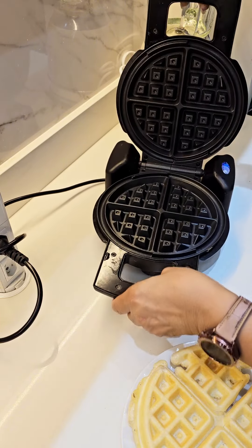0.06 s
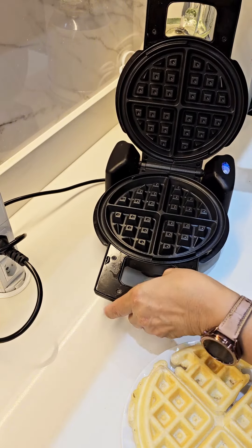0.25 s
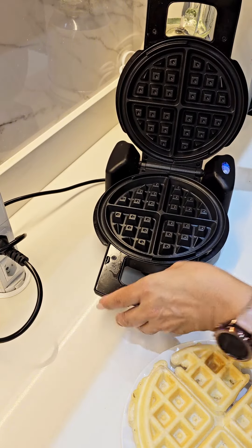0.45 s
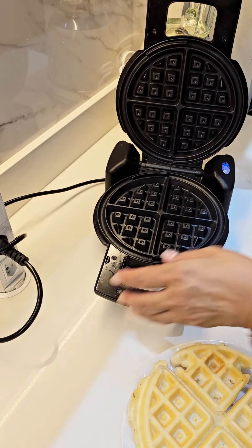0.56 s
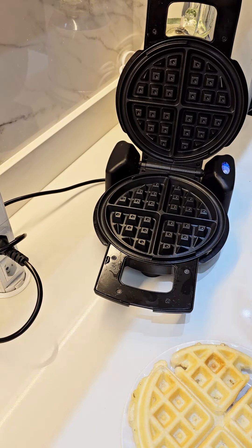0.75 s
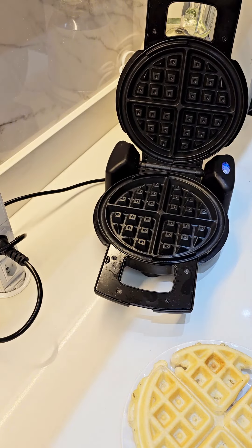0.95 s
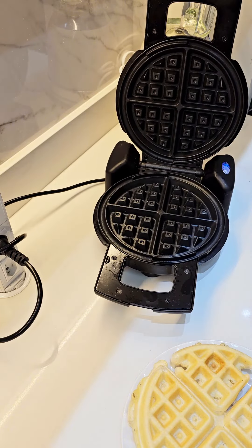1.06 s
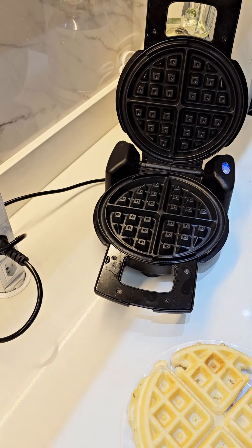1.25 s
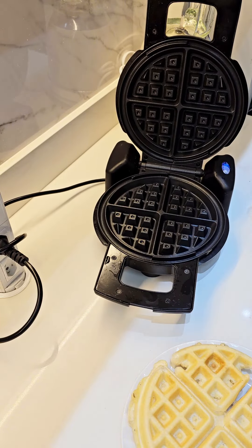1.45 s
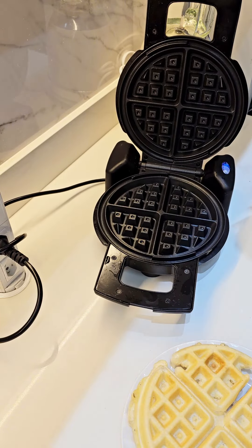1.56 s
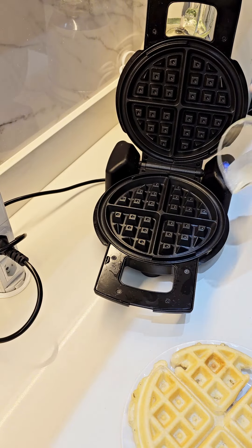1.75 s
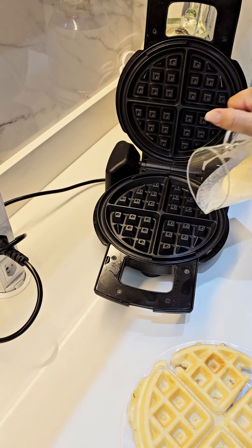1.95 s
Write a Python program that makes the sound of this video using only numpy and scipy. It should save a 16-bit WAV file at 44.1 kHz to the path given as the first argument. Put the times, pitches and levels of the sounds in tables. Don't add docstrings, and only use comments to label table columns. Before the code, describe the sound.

A waffle maker lid hits its stop with a loud plastic crack and low clunk, then a catch snaps and loose parts tick; later a sleeve brushes and a hand softly knocks the worktop, close in a tiled kitchen.

```python
import sys
import numpy as np
from scipy import signal
from scipy.io import wavfile
from scipy.ndimage import uniform_filter1d

SR = 44100
rng = np.random.default_rng(int(sys.argv[2]) if len(sys.argv) > 2 else 0)


def natural_amplitude(level_db):
    exponent = np.asarray(level_db, float) / 20
    return 10 ** exponent


def generate_wav(sig):
    pcm = np.round(np.clip(np.atleast_2d(sig).T, -1, 1) * 32767).astype(np.int16)
    wavfile.write(sys.argv[1], SR, pcm)


N = 88200

LEAD_S = .05
LONG_N = N + int(LEAD_S * SR)
OFF_PITCH_DB = 6.5


def rms_one(x):
    return x / np.sqrt(np.mean(x ** 2) + 1e-20)


def at_hz(points, hz):
    table = np.array(points)
    return np.interp(np.log(hz), np.log(table[:, 0]), table[:, 1])


def drift(rate):
    r = np.exp(-80 * np.pi * rate / SR)
    slow = signal.lfilter([1], [1, -2 * r, r * r], rng.standard_normal(N // 40 + 2002))[2000:]
    return np.interp(np.arange(N) / 40, np.arange(len(slow)), rms_one(slow - slow.mean()))


def pan(db):
    return natural_amplitude(np.array([[db / 2], [-db / 2]]))


def heard(x, lr_db, late_ms):
    n = np.arange(len(x))
    return pan(lr_db) * [np.interp(n - late_ms * SR / 1000, n, x), x]


def clicks_at(s, size):
    out = np.zeros(LONG_N)
    np.add.at(out, ((np.asarray(s) + LEAD_S) * SR).astype(int), size)
    return out


def ring(clicks, hz, t60):
    r = natural_amplitude(-60 / (max(t60, .001) * SR))
    w = 2 * np.pi * hz / SR
    return signal.lfilter([0, np.sin(w)], [1, -2 * r * np.cos(w), r * r], clicks + 1e-18)


def filtered(x, order, hz, kind="low"):
    return signal.sosfilt(signal.butter(order, hz, kind, fs=SR, output="sos"), x)


def resonant_noise(hz, width_hz):
    r = np.exp(-np.pi * width_hz / SR)
    stage = [1, 0, -1, 1, -2 * r * np.cos(2 * np.pi * hz / SR), r * r]
    return rms_one(signal.sosfilt([stage, stage], rng.standard_normal(N + SR))[SR:])


def bands(low_hz, gain):
    # f/Hz, correlation [-1..1]
    likeness = [(60, 0.57), (240, 0.71), (950, 0.026), (3770, 0.018), (15000, 0.0092)]
    edges = 18000 / 2 ** np.arange(0, np.log2(18000 / low_hz), .5)[::-1]
    white = rng.standard_normal((2, 2, N))
    out = 0
    for k, (low, high) in enumerate(zip(edges, edges[1:])):
        mid, side = filtered(white[k % 2], 2, [low, high], "band")
        hz = np.sqrt(low * high)
        alike = np.clip(at_hz(likeness, hz), -1, 1)
        stereo = np.sqrt(1 + alike) * mid + np.sqrt(1 - alike) * side * [[1], [-1]]
        out = out + gain(hz) * stereo
    return out


def house():
    # t/s, level/dB
    rumble_swell = [(0.0, -31.5), (0.03, -30), (0.07, -37), (0.22, -30.5), (0.24, -44), (0.52, -34),
                    (0.59, -44), (0.63, -30.5), (0.811, -38.5), (0.841, -28.5), (0.89, -34), (1.36, -27.5),
                    (1.49, -40), (1.54, -31.5), (1.611, -36.5), (1.65, -56), (1.68, -40.5), (2.0, -41.5)]
    # f/Hz, density/dB per Hz
    air_colour = [(80, 1), (220, -16.5), (600, -15.5), (900, -22), (2500, -26), (8500, -37), (11000, -36),
                  (16000, -32)]
    # t/s, level/dB
    air_swell = [(0, 6.5), (.6, 4), (.9, 3.5), (1.2, 4.5), (1.55, 2), (1.701, 2), (2, 0)]
    # f/Hz, width/Hz, level/dB
    whine_tones = [(7000, 300, -82), (11000, 450, -75), (13200, 600, -77)]
    hum_db, hum_follows, air_db, air_wander_db = -47, .25, -50.5, 1.0
    t = np.arange(N) / SR

    db = np.interp(t, *np.transpose(rumble_swell))
    low = resonant_noise(46.53, 17.4)
    low = low / (uniform_filter1d(low ** 2, size=950) + .02) ** .45
    hum = natural_amplitude(hum_db + hum_follows * (db - db.mean())) * resonant_noise(108.3, 25)
    hum = hum / (uniform_filter1d(rms_one(hum) ** 2, size=1500) + .1) ** .25

    swell = np.interp(t, *np.transpose(air_swell))
    air = rms_one(bands(75, lambda hz: natural_amplitude(
        at_hz(air_colour, hz) + air_wander_db * drift(1.9) + swell * (hz < 2000))))
    whines = sum(natural_amplitude(level_db) * np.array([resonant_noise(hz, width) for _ in range(2)])
                 for hz, width, level_db in whine_tones)
    sub = natural_amplitude(db - 19.0) * resonant_noise(28.4, 23.0)
    return natural_amplitude(db) * low * pan(0.98) + sub + hum + natural_amplitude(air_db) * air + whines


def kitchen(x):
    # f/Hz, t60/s
    room_t60 = [(100, 0.8), (400, 0.96), (1500, 0.65), (5000, 0.54), (14000, 0.2)]
    # f/Hz, level/dB
    room_colour = [(150, -15), (400, -1.5), (1500, 0), (5000, -2), (14000, 3)]
    room_db, first_echo_s, early_db, early_t60_s = -11.5, .003, 8, 0.072
    t = np.arange(N) / SR - first_echo_s
    early = 1 + natural_amplitude(early_db - 60 * t / early_t60_s)
    tail = bands(72.1, lambda hz: (t > 0) * early * natural_amplitude(
        at_hz(room_colour, hz) - 60 * t / at_hz(room_t60, hz)))
    return natural_amplitude(room_db) * signal.fftconvolve(x, tail / np.sqrt(SR / 20), axes=1)[:, :x.shape[1]]


def sleeve():
    # t/s, level/dB, rise/s, t60/s
    strokes = [
        (.955, -50, 0.027, 0.38),
        (.987, -42.5, 0.013, 0.43),
        (1.04, -61, 0.014, 0.21),
        (1.075, -57, 0.019, 0.12),
    ]
    # f/Hz, density/dB per Hz
    cloth = [(500, 4.5), (1000, 1.5), (3000, 0), (6000, -5), (9000, -8.5), (12000, -10.5), (16000, -10)]
    grain_db = 1.2
    t = np.arange(N) / SR
    level = 0
    for s, db, rise, t60 in strokes:
        fall = natural_amplitude(db - 60 * np.maximum(t - s - rise, 0) / t60)
        level = level + fall * np.clip((t - s) / rise, 0, 1) ** 2
    return level * natural_amplitude(grain_db * drift(110)) * rms_one(bands(400, lambda hz: natural_amplitude(at_hz(cloth, hz))))


def squeaks():
    # t/s, length/s, level/dB, f/Hz, width/Hz
    narrow_noises = [(-.01, 0.033, -44.5, 654, 597), (0.082, 0.026, -50, 600, 197),
                     (0.087, 0.017, -63.5, 13000, 6000), (0.246, 0.1, -43, 687, 59), (0.281, 0.06, -38, 209.5, 30.2),
                     (0.419, 0.088, -44, 292, 25.2), (0.518, 0.063, -60.5, 3164, 150),
                     (0.64, 0.023, -73.5, 7600, 600), (0.918, 0.07, -58, 3180, 513), (0.943, 0.062, -60, 2270, 605),
                     (1.125, 0.5, -64, 571, 147), (1.22, 0.026, -57.5, 1070, 1460), (1.723, 0.077, -69, 4050, 150),
                     (1.702, 0.017, -66, 2920, 300), (1.794, 0.071, -53, 2110, 220),
                     (1.845, 0.043, -64.5, 9100, 2520), (1.887, 0.06, -69.5, 3710, 244)]
    attack_s, flicker_db = 0.0051, -1.5
    t = np.arange(N) / SR
    out = 0
    for s, length, db, hz, width in narrow_noises:
        rub = natural_amplitude(db + flicker_db * drift(39)) * resonant_noise(hz, width)
        rise = np.clip((t - s) / attack_s, 0, 1)
        release = np.exp(-np.maximum(t - s - length, 0) / (length * 0.51))
        out = out + rub * rise * release
    return out


def knocks():
    # t/s, level/dB, f/Hz, t60/s
    taps = [(-.004, -28, 387, 0.076), (-.003, -31.5, 643, 0.071), (-.004, -32, 199.4, .08),
            (.99, -36.5, 970, 0.021), (0.991, -34.5, 214, 0.048), (1.002, -41, 443, 0.066),
            (1.055, -41, 430, 0.041), (1.078, -40.5, 900, 0.044), (1.121, -47, 1580, .02),
            (1.124, -45, 940, 0.038), (1.134, -46, 333, 0.084), (1.155, -43, 630, 0.056),
            (1.173, -45, 650, .04), (1.195, -47, 596, 0.045), (1.223, -39, 513, 0.034),
            (1.226, -48, 1640, 0.022), (1.231, -45, 770, 0.04), (1.234, -38, 590, 0.038),
            (1.247, -42, 458, .03), (1.261, -41, 543, 0.039), (1.274, -50, 860, 0.033),
            (1.279, -40, 420, 0.047)]
    rise_s = .003
    soft = np.hanning(int(2 * rise_s * SR))
    t = np.arange(len(soft)) / SR
    out = 0
    for s, db, hz, t60 in taps:
        contact = soft * np.cos(2 * np.pi * hz * t) * 2 / soft.sum()
        push = np.convolve(clicks_at([s], natural_amplitude(db)), contact)[:LONG_N]
        out = out + ring(push, hz, t60)
    return out


def loose_parts():
    # t/s, peak level/dB, left-right/dB, fade of the touches/s, favoured f/Hz
    ticks = [(0.0746, -39.5, 6.5, 0.0056, 2000), (0.1767, -35, 5, 0.016, 2190),
             (0.394, -30, -3, 0.0053, 1900), (0.409, -32, -7, 0.0055, 2900), (0.416, -33, 11, 0.006, 2100),
             (0.426, -40, 3, 0.006, 2100), (0.4401, -31.5, 0, 0.0022, 2770),
             (0.4438, -32, -1, 0.0056, 1670), (0.456, -34, 5, 0.0067, 1670),
             (0.4831, -37.5, -8, .004, 2440), (.489, -36.5, 2, .003, 1640), (0.515, -40, 3, 0.0025, 2170),
             (0.5197, -34.5, -1, 0.002, 1670), (0.9898, -38, 7, 0.0018, 1900),
             (1.732, -50.5, -3, .008, 1900), (1.93, -53.5, -5, 0.012, 2200)]
    # f/Hz, level/dB, t60/s
    latch = [(1670, -4, 0.018), (2017, -3.5, 0.01), (2420, -5.5, 0.0038), (2870, -6, 0.012),
             (3180, -5, 0.0088), (4100, -8, 0.0098), (5100, -13.5, 0.0083), (6200, -11, 0.0026),
             (7600, -17, .003), (10000, -28, 0.0019), (13000, -35, 0.0018)]
    touches_per_s, first_touch, bright_share, low_cut_hz = 2500, .6, 0.94, 620
    t = np.arange(LONG_N) / SR - LEAD_S
    hit = rng.random(len(t)) < touches_per_s / SR
    out = 0
    for hz, level_db, t60 in latch:
        sizes = 1.21 * rng.standard_normal((2, len(t))) + rng.standard_normal(len(t))
        clicks = 0
        for s, db, lr, length, pitch in ticks:
            run = hit * (t > s) * np.exp(-np.abs(t - s) / length) * sizes
            run = run + clicks_at([s], first_touch)
            off_pitch = OFF_PITCH_DB * abs(np.log2(hz / pitch))
            bright = bright_share * (db + 13.0) / 5 * np.log2(hz / 2000)
            clicks = clicks + run * pan(lr) * natural_amplitude(db - 4.5 + level_db - off_pitch + bright)
        out = out + ring(clicks, hz, t60)
    return filtered(out, 1, low_cut_hz, "high")


def catch():
    # t/s, level/dB, favoured f/Hz
    snap = [
        (0.3776, -23, 4500),
        (.3786, -17, 2100),
        (0.3795, -20.5, 2870),
        (0.3798, -24, 9000),
        (0.3819, -19, 2080),
        (0.383, -21.5, 1700),
        (.3848, -24.5, 3000),
        (.387, -33, 2920),
    ]
    # f/Hz, level/dB, t60/s, left-right/dB
    catch_modes = [(1440, -3, 0.0094, -6), (1680, -1, .011, -1), (2154, 1, 0.012, 6), (2344, -4, 0.0087, 6),
                   (3026, -1.5, 0.012, 2), (3266, -5, 0.0072, 0), (3620, -14.5, 0.014, 0),
                   (4230, -5, 0.007, 5), (5220, -10.5, 0.01, 7), (6220, -10, 0.0068, 4),
                   (7850, -13.5, 0.0064, 7), (10000, -14.5, 0.0035, 5), (12400, -14, .004, 11),
                   (14800, -23, .003, 10)]
    low_cut_hz = 1070
    s, db, pitch = np.transpose(snap)
    turn = (-1) ** np.arange(len(s))
    out = 0
    for k, (hz, level_db, t60, lr) in enumerate(catch_modes):
        off_pitch = OFF_PITCH_DB * np.abs(np.log2(hz / pitch))
        clicks = clicks_at(s, turn * natural_amplitude(db + level_db - off_pitch))
        out = out + pan(lr) * ring(clicks, hz, t60) * (-1) ** k
    return filtered(out, 2, low_cut_hz, "high")


def lid():
    # t/s, crack level/dB, body level/dB
    blows = [
        (-.012, -24, -18.5),
        (0.1966, -97, -18),
        (0.204, -4.5, 1),
        (.386, -63, -28),
    ]
    # t after first touch/s, level/dB
    chatter = [
        (0, 8.5),
        (.0009, -6),
        (.0016, -1.5),
        (.0023, 0.5),
    ]
    # f/Hz, level/dB, t60/s, left-right/dB, left ear late/ms
    shell = [(890, -23, 0.019, -21.5, 1), (1520, 0, 0.0023, -3.5, 0.19), (2362, -9.5, 0.019, 5.5, 0.063),
             (3510, -4.5, 0.0035, 4.5, 0.13), (4700, -6.5, 0.0025, 13, 0.084),
             (6400, -9.5, 0.0027, 4, 0.044), (7820, -14, 0.0025, 7, 0.049), (9400, -20.5, 0.0033, 2, 0.049),
             (10850, -19, 0.0037, 9, 0.059), (12500, -23, .005, 2, 0.026), (14500, -22, 0.006, 9, 0.023)]
    housing_hz = [221, 293, 346, 500, 644, 950, 1060, 1365, 1550, 1980, 2342]
    # level/dB, t60/s, left-right/dB, left ear late/ms
    housing = [(-8, 0.12, 2, 0.16), (-27, 0.19, 8, 0.95), (-8, 0.088, 4.5, 0.25), (-47, 0.016, 2, 1),
               (-11, 0.071, 2.5, 0.54), (-13, 0.031, -9.5, 0.21), (-14, 0.039, 8.5, 0.23),
               (-18, 0.018, 19, 0.081), (-26.5, 0.1, 12.5, 0.21), (-18.5, 0.041, -9, 0),
               (-27, 0.025, -3, 0.35)]
    # f/Hz, level/dB, t60/s
    worktop = [(120.9, -5.5, 0.23), (131.1, -19.5, 0.48)]
    touch_hz, contact_hz = 9000, 3030
    body_lag_s, upper_t60_s = 0.002367, .08
    worktop_rise_s, worktop_held = 0.053, 0.64

    touches = [(s + after, -natural_amplitude(db + less)) for s, db, _ in blows for after, less in chatter]
    touch = filtered(clicks_at(*np.transpose(touches)), 2, touch_hz)
    pushes = [(s + body_lag_s, natural_amplitude(db)) for s, _, db in blows]
    push = filtered(clicks_at(*np.transpose(pushes)), 1, contact_hz)

    out = 0
    for hz, db, t60, lr, ms in shell:
        out = out + natural_amplitude(db) * ring(heard(touch, lr, ms), hz, t60)
    for hz, (db, t60, lr, ms) in zip(housing_hz, housing):
        if hz >= housing_hz[3]:
            t60 = min(t60, upper_t60_s)
        out = out + natural_amplitude(db) * ring(heard(push, lr, ms), hz, t60)
    for hz, db, t60 in worktop:
        out = out - natural_amplitude(db) * (ring(push, hz, t60) - worktop_held * ring(push, hz, worktop_rise_s))
    return out


def scene():
    near = lid() + catch() + loose_parts() + knocks()
    near[:, -N:] += squeaks()
    return (near + kitchen(near))[:, -N:] + sleeve() + house()


def low_pass(x):
    return signal.sosfilt(signal.butter(12, 16510, fs=SR, output="sos"), x)


def record(dry):
    ceiling, cutoff_hz = .93, 15750
    x = ceiling * np.tanh(dry / ceiling)
    x = signal.sosfilt(signal.ellip(12, .5, 45, cutoff_hz, fs=SR, output="sos"), x)
    return low_pass(x)


dry = scene()
out = record(dry)
generate_wav(out)
```